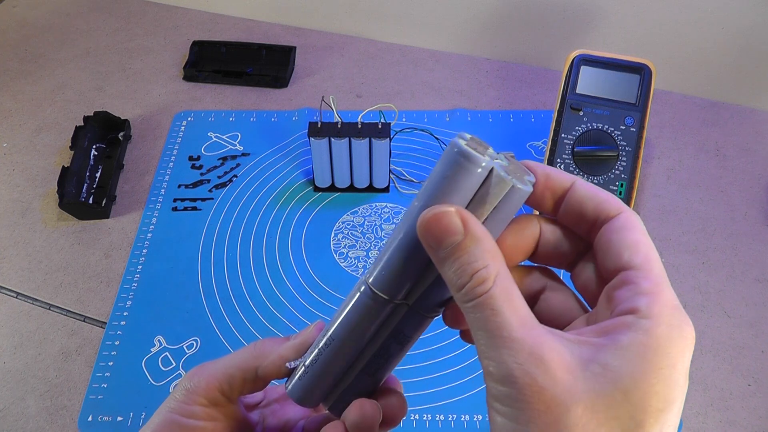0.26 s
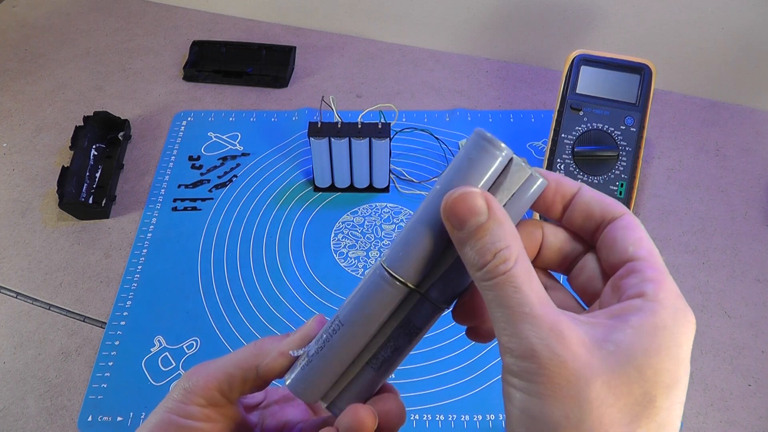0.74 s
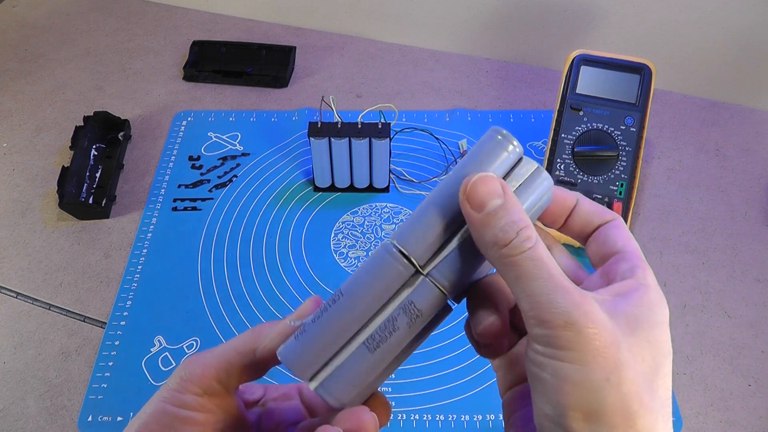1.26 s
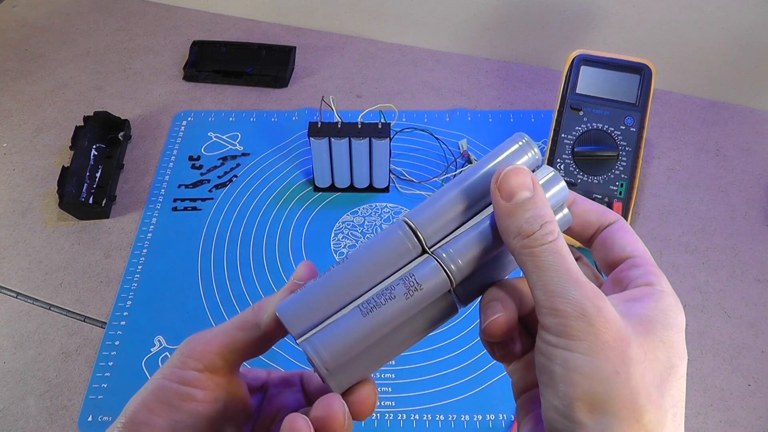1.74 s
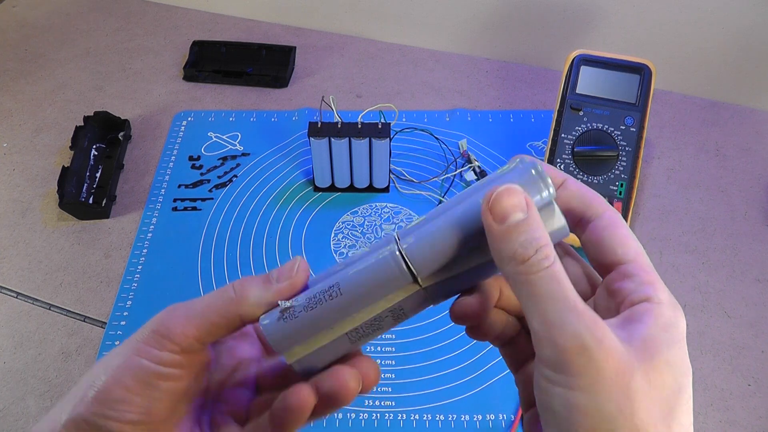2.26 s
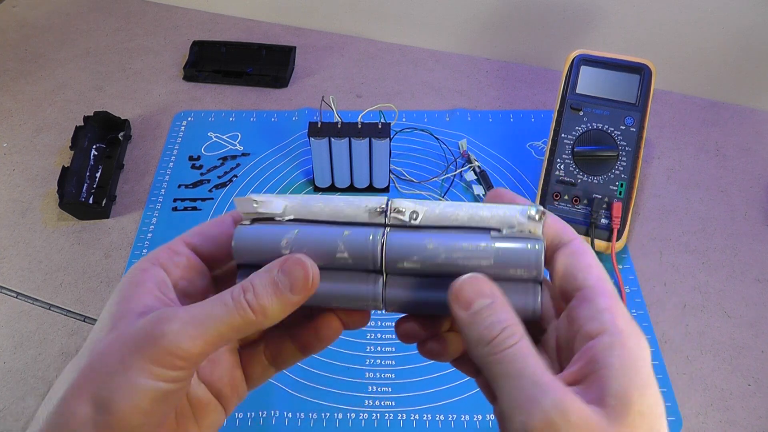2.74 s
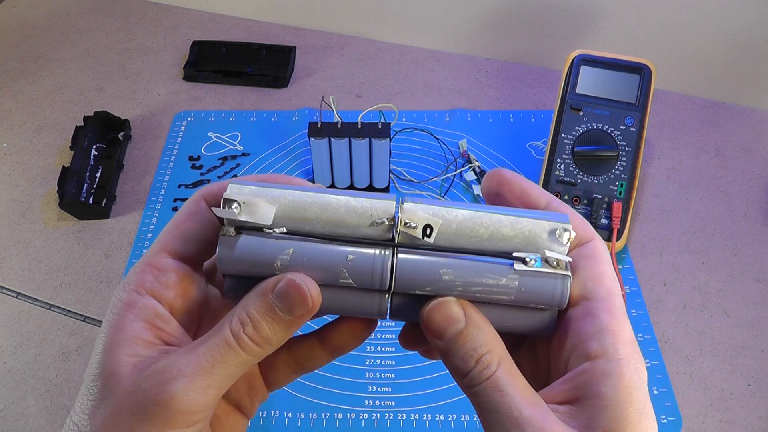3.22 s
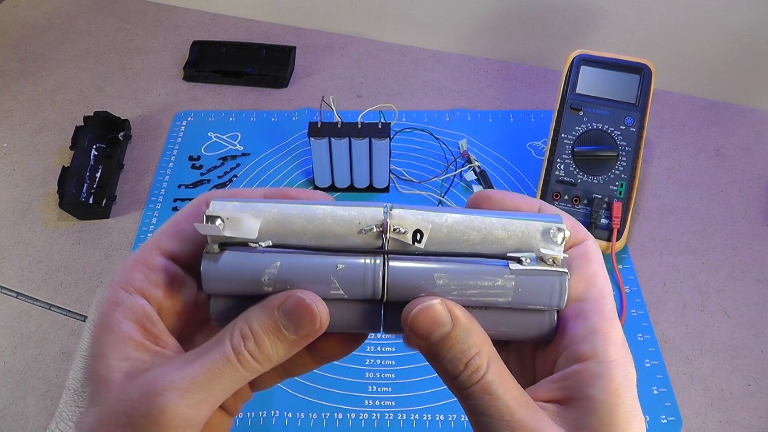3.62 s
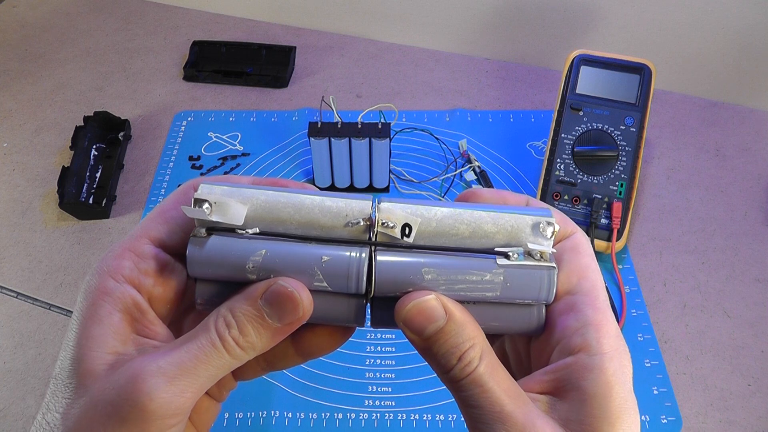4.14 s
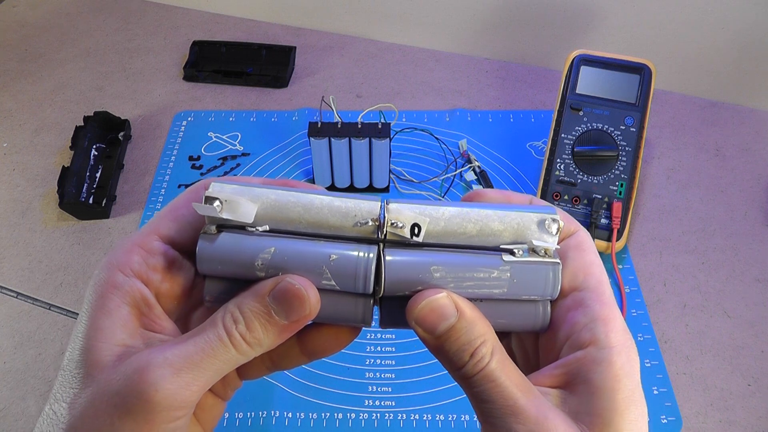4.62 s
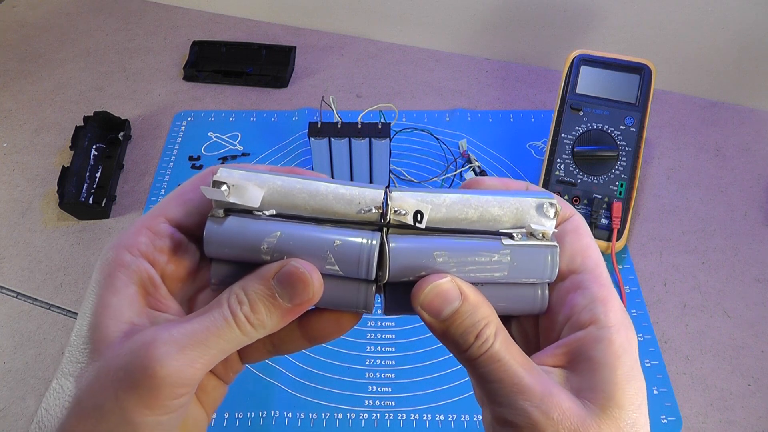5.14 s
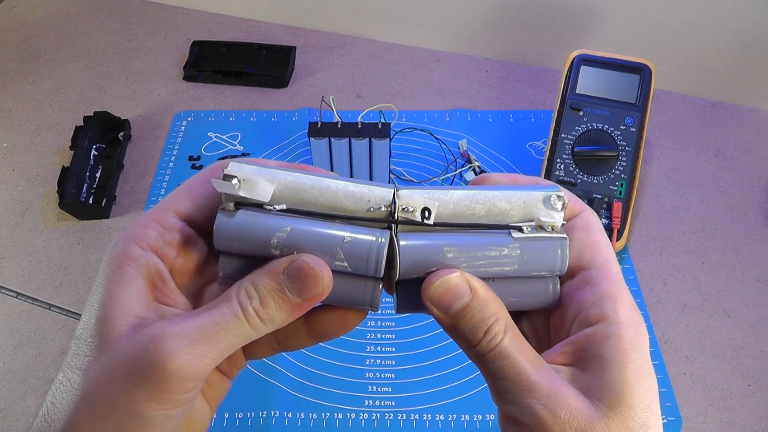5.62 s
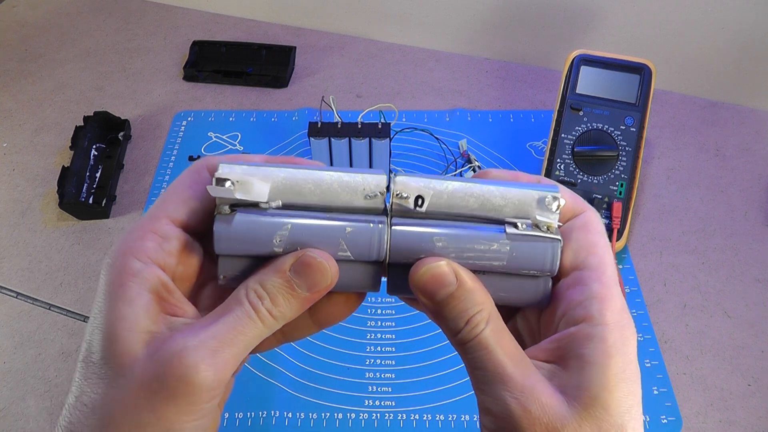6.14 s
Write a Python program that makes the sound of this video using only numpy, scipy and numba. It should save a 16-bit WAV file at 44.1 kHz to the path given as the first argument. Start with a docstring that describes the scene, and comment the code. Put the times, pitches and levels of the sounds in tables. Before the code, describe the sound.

Close to the microphone in a quiet, hard-walled room, two hands turn a pack of cylindrical battery cells. Light clicks and a soft skin rub come first, then a short rasp, then brighter ticks with tiny creaks as the pack flexes. A very sharp knock comes late, followed by two more at the end. Steady low hum and faint hiss run underneath.

```python
"""Mains hum, a thin wavering tone and smooth hiss lie under a quiet, hard-walled room throughout.
From 1.2 s two hands turn a pack of cylindrical battery cells close by: struck modes tick and knock,
and grainy friction noise brushes as skin slides over the wrap. From 4.1 s tiny slips creak as the pack flexes.
The loudest knocks, near 5.5 and 6.2 s, trip the gain control, which ducks the hum and shifts the offset;
a brief low pulse goes with the hardest of them."""
import sys
import numpy as np
from scipy import signal
from scipy.fft import rfft, irfft
from scipy.io import wavfile
from scipy.ndimage import uniform_filter1d
from numba import njit

SR = 44100
rng = np.random.default_rng(int(sys.argv[2]) if len(sys.argv) > 2 else 0)


def output_pcm(signal):
    """Save a mono or channel-first signal as 16-bit PCM at the path in sys.argv[1].

    Samples are clipped to [-1, 1] before scaling.
    """
    pcm = np.clip(np.atleast_2d(signal).T, -1, 1) * 32767
    wavfile.write(sys.argv[1], SR, np.round(pcm).astype(np.int16))


def gain_from_db(level_db):
    """Convert decibel levels to linear amplitude factors (20 dB per decade)."""
    decades = np.asarray(level_db, float) / 20
    return 10 ** decades


N = 281358

# ringing modes of the cell pack: centre_hz, width_hz, level_db
PACK_MODES = [(3250, 410, -9.5), (3763, 224, 0.5), (4620, 133, -11), (4800, 274, -6), (6400, 480, -4.5)]
# modes of cells damped by the palm: centre_hz, width_hz, level_db
PALM_MODES = [(966, 365, 3), (1113, 760, 6.5), (1790, 220, 0.5), (2253, 460, 7), (2497, 370, 8)]


def unit(x):
    """Scale to rms 1."""
    return x / np.sqrt(np.mean(x ** 2))


def peak(x):
    """Scale to peak 1."""
    return x / np.abs(x).max()


def curve(table):
    """Columns of a table along time; dB columns fall silent outside it."""
    time_s, *columns = np.transpose(table)
    return [np.interp(np.arange(N) / SR, time_s, c, left=-140, right=-140) for c in columns]


def ring(x, hz, width_hz):
    """One band-pass resonance whose impulse response peaks near 1."""
    radius = np.exp(-np.pi * max(width_hz, 5) / SR)
    angle = 2 * np.pi * hz / SR
    return signal.lfilter([1, 0, -1], [1, -2 * radius * np.cos(angle), radius * radius], x) / 2


def body(x, modes, tilt_db=0):
    """All modes of an object driven by x; tilt_db per octave lifts the upper ones, or dulls them if negative."""
    out = 0
    for k, (hz, width_hz, level_db) in enumerate(modes):
        tilted_db = level_db + tilt_db * np.log2(hz / modes[0][0])
        out = out + (-1) ** k * gain_from_db(tilted_db) * ring(x, hz, width_hz)  # neighbours in opposite phase
    return out


def band(x, lo_hz, hi_hz, order=2):
    """Steep band-pass."""
    sos = signal.butter(order, [lo_hz, min(hi_hz, .45 * SR)], "band", fs=SR, output="sos")
    return signal.sosfilt(sos, x)


def hum():
    """Mains pickup: a sine with odd multiples that waver in level, and a thin wavering tone."""
    # mains lines: multiple, level_db (rms)
    multiples = [(1, -54), (3, -62.5), (5, -79.5), (7, -89.5), (9, -93), (11, -94)]
    # faint tone along time: time_s, level_db
    whine_level = [(0, -82.5), (.7, -89), (1.6, -90.5), (1.8, -83.5), (4.6, -87), (4.9, -103), (6.38, -78)]
    mains_hz, waver_db = 50, 1
    whine_hz, whine_width_hz, beat_hz = 1390, 6.9, 21.6
    turn = 2 * np.pi * mains_hz * np.arange(N) / SR
    lines = 0
    for k, level_db in multiples:
        waver = 1  # the fundamental is steady
        if k > 1:
            waver = gain_from_db(waver_db * unit(band(rng.standard_normal(N), 0.56, 9, order=1)))
        lines = lines + np.sqrt(2) * gain_from_db(level_db) * waver * np.sin(k * turn)
    # two close sines beat, so the core flutters
    core = np.sin(turn * whine_hz / mains_hz) + 0.94 * np.sin(turn * (whine_hz - beat_hz) / mains_hz)
    wander = unit(ring(rng.standard_normal(N), whine_hz, whine_width_hz))
    return lines + gain_from_db(curve(whine_level)[0]) * unit(core + wander)


def hiss():
    """Smooth amplifier and room noise: white noise shaped along frequency."""
    # noise spectrum: pitch_hz, density_db (per Hz, relative)
    spectrum = [(20, -30), (45, -27), (75, -7), (100, -5), (200, -12.5), (400, -14), (1400, -20),
                (4000, -24.5), (15300, -26.5), (16000, -61)]
    hiss_db = -77  # rms
    hz, density_db = np.transpose(spectrum)
    log_hz = np.log(np.fft.rfftfreq(N, 1 / SR) + 1)
    shape = gain_from_db(np.interp(log_hz, np.log(hz), density_db))
    return gain_from_db(hiss_db) * unit(irfft(rfft(rng.standard_normal(N)) * shape, N))


def low_partials():
    """Low and middle partials of the knocks, dull and hard: a smooth pulse drives each damped note."""
    # partials, rows at nearly one time belong together: start_s, peak_db, pitch_hz
    partials = [(1.209, -54, 2840), (1.211, -64, 1930), (1.332, -39, 884), (1.332, -47, 1804),
                (1.398, -50.5, 890), (2.428, -50.5, 1745), (2.428, -68, 970), (2.497, -51, 219),
                (2.496, -57, 560), (2.496, -53.5, 2110), (3.42, -59.5, 477), (3.415, -62, 1230),
                (3.477, -51.5, 860), (3.544, -43, 1235), (3.542, -47, 1675), (3.542, -50, 2420),
                (5.4914, -22.5, 993), (6.134, -49, 1410)]
    out = np.zeros(N)
    for start_s, peak_db, hz in partials:
        pulse = np.exp(-((np.arange(N) / SR - start_s) * hz * 2 * np.pi) ** 2)
        width_hz = min(105, hz / 6)  # low notes ring narrower
        note = ring(ring(pulse, hz, width_hz), hz, 2 * width_hz)  # swells for a few cycles, then dies
        out += gain_from_db(peak_db) * peak(note)
    return out


def clicks():
    """Each touch is a blow with brief chatter into pack, tabs and palm, plus its own strongest ring."""
    # cells touching: start_s, peak_db (of the pack layer), treble_db and dull_db (before a common lift
    # of tabs and palm), ring_hz (strongest ring)
    touches = [(1.21, -57, -25, -5, 4560), (1.332, -32.5, -76, -1.5, 3320),
               (1.3383, -38.5, -84, -3.5, 4280), (1.392, -53, -65, 7.5, 2560), (1.485, -42, 7.5, -12, 6940),
               (1.518, -50.5, 5.5, -12, 12800), (1.524, -50.5, 7, -32, 11400), (1.757, -71.5, 7, -9, 12300),
               (2.2797, -54, -16, -27, 3400), (2.297, -33.5, -4.5, -38, 8780),
               (2.395, -27.5, -4.5, -30, 8900), (2.429, -47, -74, 3.5, 3280),
               (2.4904, -39.5, -5, -20, 3700), (2.4963, -37.5, -1, -12.5, 10000),
               (2.655, -52.5, 6.5, -17, 4800), (3.475, -50.5, -21, -7, 2450), (4.282, -62, 1, -6, 3550),
               (4.3693, -56.5, 0, -30, 3720), (4.3944, -33, -3.5, -48, 3850), (4.5098, -56, -6, -23, 6400),
               (4.52, -54.5, 6, -14, 6400), (4.533, -22.5, -6.5, -33, 3740), (4.775, -36, -2.5, -42, 3740),
               (4.8062, -42.5, -3, -43, 3740), (4.833, -49.5, 0.5, -39, 3740), (5.004, -26, -13, -36, 3850),
               (5.1161, -43, -0.5, -42, 12200), (5.134, -48, -2, -38, 3930),
               (5.1927, -37.5, -3, -26, 12100), (5.2279, -29.5, -1, -37, 3810),
               (5.293, -44.5, -2.5, -50, 4050), (5.3567, -33.5, -9.5, -41, 4330),
               (5.444, -54, 5, -12, 12800), (5.4726, -40, -1.5, -15, 3970),
               (5.4893, -15, 0.5, -41.5, 11200), (5.4914, 6, -5.5, -15, 5830),
               (5.4979, -5.5, -8, -30.5, 7700), (5.8791, -38, -1, -28, 3250),
               (5.955, -15.5, -8.5, -16, 3255), (6.061, -27, -8, -20.5, 7440), (6.1337, -41, 3, -11, 5580),
               (6.1674, -40.5, -3, -11, 6300), (6.182, -27.5, -2, -15, 3250), (6.2017, -4, -3, -11.5, 5400),
               (6.2362, 5.5, -9, -19, 3930)]
    # thin metal strips: centre_hz, width_hz, level_db
    tab_modes = [(9300, 4200, 6), (10600, 1470, 6), (14920, 2700, 8), (16900, 760, 4)]
    bundle_hz, bundle_width_hz = 5050, 1040
    t = np.arange(4096) / SR
    out = np.zeros(N + len(t))
    for start_s, peak_db, treble_db, dull_db, ring_hz in touches:
        # bright, light touches chatter longer
        chatter_ms = max(2.57 * gain_from_db(0.77 * treble_db - 0.05 * peak_db), .2)
        grain, unevenness = rng.standard_normal((2, len(t)))
        blow = grain * gain_from_db(7 * unevenness) * np.exp(-t / (chatter_ms / 1000))
        blow += gain_from_db(-6.5) * grain * np.exp(-t / 0.009)  # the bundle rustles as it settles
        blow[0] += gain_from_db(22 - 0.02 * peak_db)  # first contact

        soft_db = 0.5 * min(treble_db + 6.0, 0)  # duller touches also miss the upper modes
        # unpitched crack between the modes, growing with force and brightness
        crack_db = soft_db + 26.5 + 0.2 * peak_db + 0.82 * max(treble_db, -9)
        pack = peak(band(body(blow, PACK_MODES, soft_db) + gain_from_db(crack_db) * blow, 2880, 7970, order=4))
        tabs = peak(band(body(blow, tab_modes) + 0.79 * blow, 7760, 13690, order=3))
        palm = peak(band(body(blow, PALM_MODES), 955, 4200, order=3))

        own_width_hz = max(.1 * gain_from_db(.3 * peak_db) * ring_hz, 160)  # hard knocks ring broader
        own = peak(band(ring(blow, ring_hz, own_width_hz), ring_hz / 1.3, ring_hz * 1.3))
        own_db = -6 - 0.08 * peak_db  # the harder the knock, the less one ring stands out
        if ring_hz < 2500:
            own_db += dull_db
        elif ring_hz > 7500:
            own_db += treble_db

        # broad shudder that fades quickly below the hardest knocks
        shudder_db = 1.6 * min(peak_db + 14.5, 0) - 5.0
        lo_hz, hi_hz = bundle_hz - bundle_width_hz / 2, bundle_hz + bundle_width_hz / 2
        shudder = peak(band(blow, lo_hz, hi_hz, order=3))

        touch = pack + gain_from_db(treble_db + 5.5) * tabs + gain_from_db(dull_db + 2.0) * palm
        touch = touch + gain_from_db(own_db) * own + gain_from_db(shudder_db) * shudder
        i = int(start_s * SR)
        out[i:i + len(t)] += gain_from_db(peak_db) * touch
    return out[:N]


def room(x):
    """Diffuse reflections swell in after a short gap, then each band dies at its own rate."""
    # main tail bands: pitch_hz, t60_s, level_db
    tail_bands = [(360, 0.18, -9.5), (1430, 0.33, -24.5), (1950, 0.64, -25), (3580, 0.31, -23.5),
                  (4800, 0.74, -29.5), (7500, 0.37, -22.5), (12700, 0.27, -20.5)]
    # extra tail bands: centre_hz, width_hz, t60_s, level_db
    lingering = [(3550, 1300, 0.55, -30), (5260, 1120, 0.7, -26)]
    gap_s = 0.00098
    t = np.arange(int(.8 * SR)) / SR
    bands = [(hz / 1.88, hz * 1.6, t60_s, db) for hz, t60_s, db in tail_bands]
    bands += [(hz - w / 2, hz + w / 2, t60_s, db) for hz, w, t60_s, db in lingering]
    tail = 0
    for lo_hz, hi_hz, t60_s, level_db in bands:
        part = band(rng.standard_normal(len(t)), lo_hz, hi_hz)
        part = part * 1000. ** (-t / t60_s) * (1 - np.exp(-(t / gap_s) ** 2))
        tail = tail + gain_from_db(level_db) * part / np.sqrt(np.sum(part ** 2))  # level sets the band's energy
    return signal.fftconvolve(x, tail)[:N]


def slide():
    """Skin rubs the wrap: dense, grainy friction colours the wrap and the palm behind it."""
    # strokes: start_s, loudest_s, end_s, level_db, dull_db (palm share), brightest_hz
    strokes = [(1.28, 1.348, 1.55, -61, -14, 3160), (3.153, 3.202, 3.3, -75.5, -8, 3520),
               (3.278, 3.453, 3.67, -62, -1.5, 3290), (3.698, 3.736, 3.96, -69.5, -5.5, 3060)]
    spread = .08  # half-width of the wrap's band over its centre
    grain = rng.standard_normal(N) * gain_from_db(3.5 * unit(uniform_filter1d(rng.standard_normal(N), size=150)))
    # the skin catches and slips
    grain = grain * gain_from_db(2.6 * unit(band(rng.standard_normal(N), 8, 40, order=1)))
    palm = unit(band(body(grain, PALM_MODES, -5.0), 1160, 1950))
    out = 0
    for start_s, loudest_s, end_s, level_db, dull_db, hz in strokes:
        stroke = np.interp(np.arange(N) / SR, [start_s, loudest_s, end_s], [0, 1, 0]) ** 1.6
        wrap = unit(band(grain, (1 - spread) * hz, (1 + spread) * hz, order=3))
        wrap = wrap + gain_from_db(-7.5) * unit(band(grain, 1.12 * hz, 1.59 * hz, order=3))
        out = out + gain_from_db(level_db) * stroke * (wrap + gain_from_db(dull_db) * palm)
    return out


def creak():
    """The pack flexes: glue and wrap let go in tiny slips of very uneven size; each judders a moment."""
    # creak along time: time_s, level_db
    flexing = [(4.1, -100), (4.33, -75), (4.45, -65.5), (4.65, -90), (4.82, -68), (4.92, -77), (5.1, -63),
               (5.47, -64), (5.6, -100), (5.85, -64), (6.05, -61), (6.38, -85)]
    slips_per_s, judder_s = 350, 0.0017
    slips = (rng.random(N) < slips_per_s / SR) * gain_from_db(5 * rng.exponential(size=N).clip(0, 4))
    judder = signal.lfilter([1], [1, -np.exp(-1 / (judder_s * SR))], slips) * rng.standard_normal(N)
    tone = unit(band(body(judder, PACK_MODES, 5.6), 2800, 9200, order=3))
    tone = tone + gain_from_db(1.5) * unit(band(judder, 8900, 14500, order=3))
    return gain_from_db(curve(flexing)[0]) * unit(tone)


def low_pulses():
    """Brief, one-sided low-frequency pulses that accompany the gain drop at the hardest knocks."""
    # pulses: start_s, peak_db, spread_ms
    pulses = [(5.491, -23.5, 0.29), (6.2015, -28.5, 0.81), (6.2365, -10.5, 0.19)]
    t = np.arange(N) / SR
    out = 0
    for start_s, peak_db, spread_ms in pulses:
        out = out + gain_from_db(peak_db) * np.exp(-((t - start_s) * 1000 / spread_ms - 2) ** 2)
    return out


@njit
def duck(x, top, attack, release):
    """Gain falls fast while the sound passes top and creeps back to 1."""
    gain, g = np.empty(len(x)), 1.
    for i in range(len(x)):
        want = top / max(abs(x[i]), top)
        g += (want - g) * (attack if want < g else release)
        gain[i] = g
    return gain


def scene():
    """Hands and cells in the room over hum and hiss."""
    near = clicks() + creak() + slide()
    low = low_partials()
    reflections = room(near + gain_from_db(-8) * low)
    mix = near + low + reflections - low_pulses() + hum() + hiss()
    return mix[None]


def roll_off(x):
    """The treble ends steeply here."""
    return signal.sosfilt(signal.butter(12, 17000, fs=SR, output="sos"), x)


def record(dry):
    """Gain control scales sound and offset alike; a coupling capacitor makes offset steps slow thumps."""
    top, attack_s, release_s = 0.22, 0.00075, 0.23
    ceiling, offset = 0.51, 0.088
    coupling_hz, top_hz = 3.84, 16400
    x = dry[0]
    gain = duck(x, top, 1 / (attack_s * SR), 1 / (release_s * SR))
    squashed = ceiling * np.tanh(gain * x / ceiling)  # soft clipping
    shifted = squashed + offset * (gain - 1)
    pole = np.exp(-2 * np.pi * coupling_hz / SR)
    coupled = signal.lfilter([1, -1], [1, -pole], shifted)
    mix = signal.sosfilt(signal.ellip(8, .2, 70, top_hz, fs=SR, output="sos"), coupled)  # steep low-pass
    return roll_off(mix[None])


dry = scene()
out = record(dry)
output_pcm(out)
```